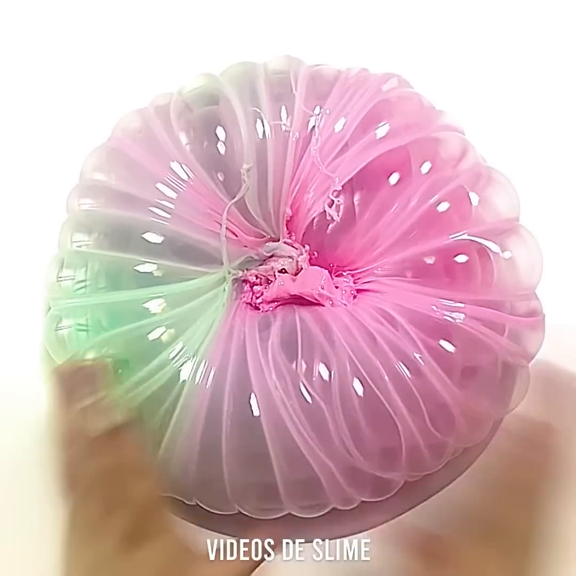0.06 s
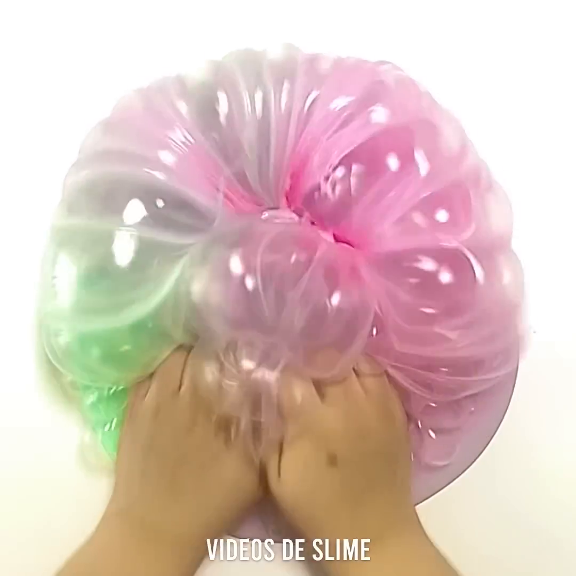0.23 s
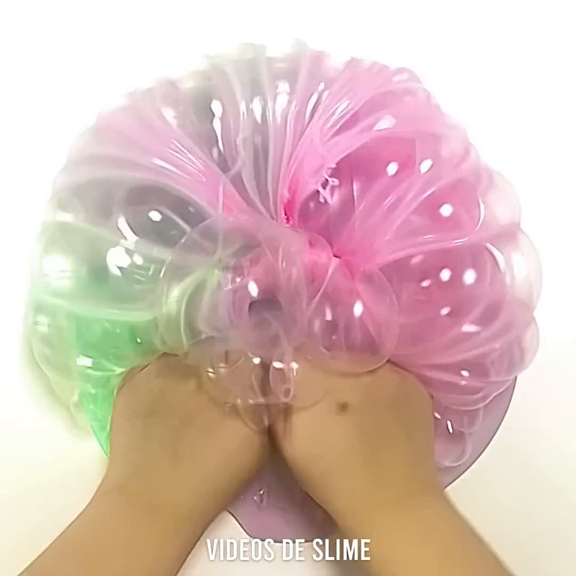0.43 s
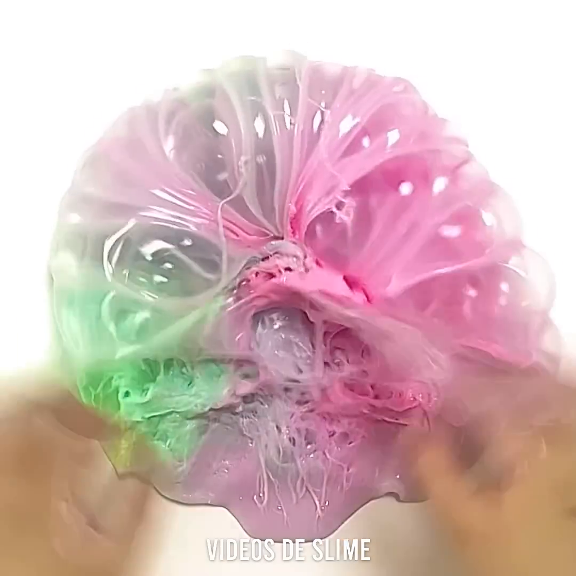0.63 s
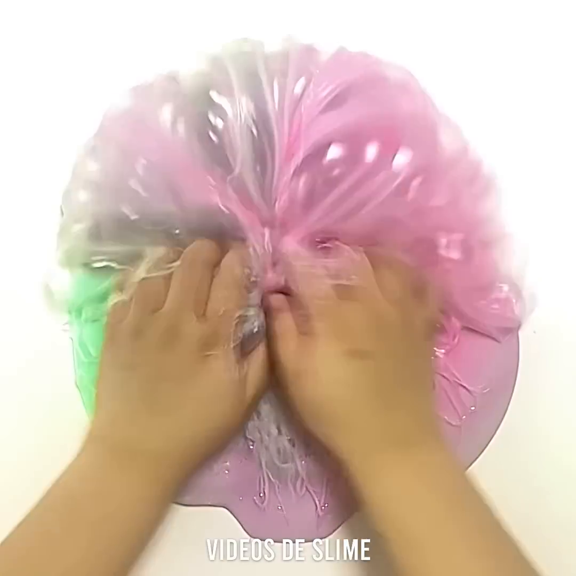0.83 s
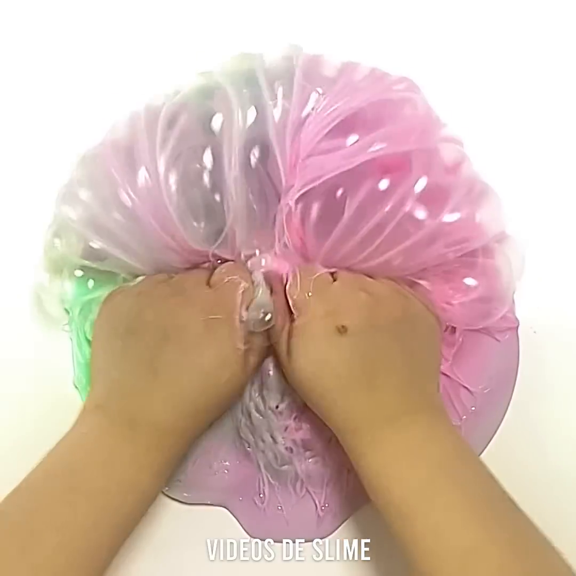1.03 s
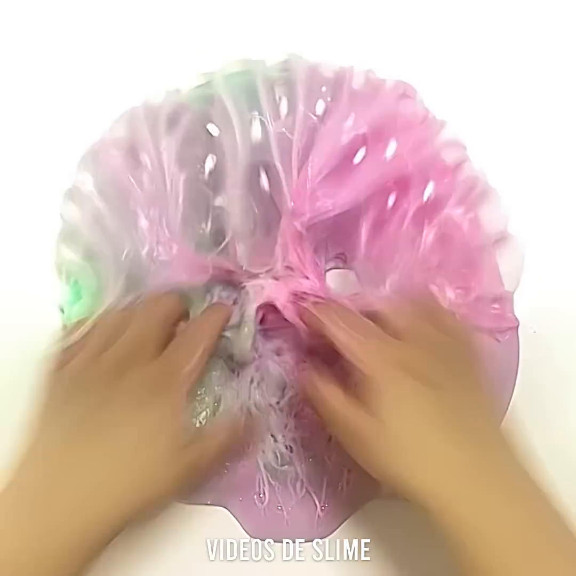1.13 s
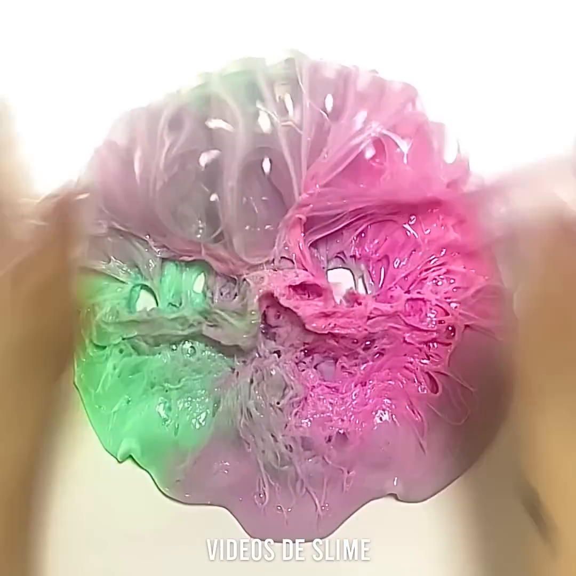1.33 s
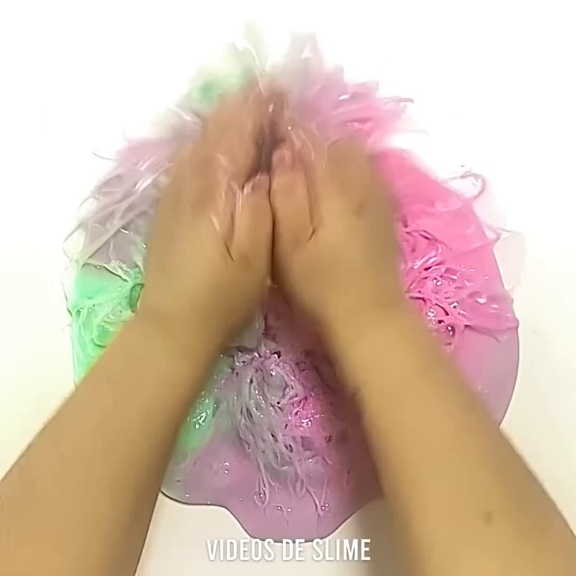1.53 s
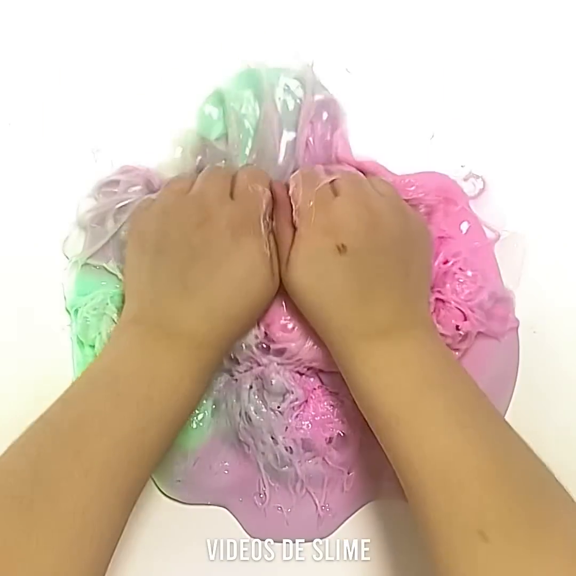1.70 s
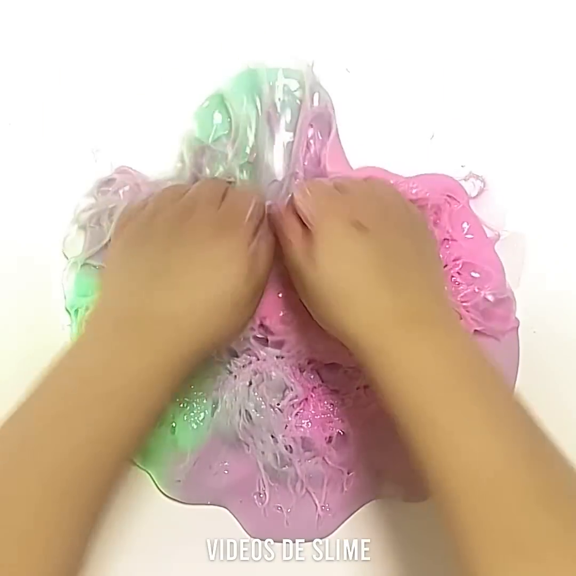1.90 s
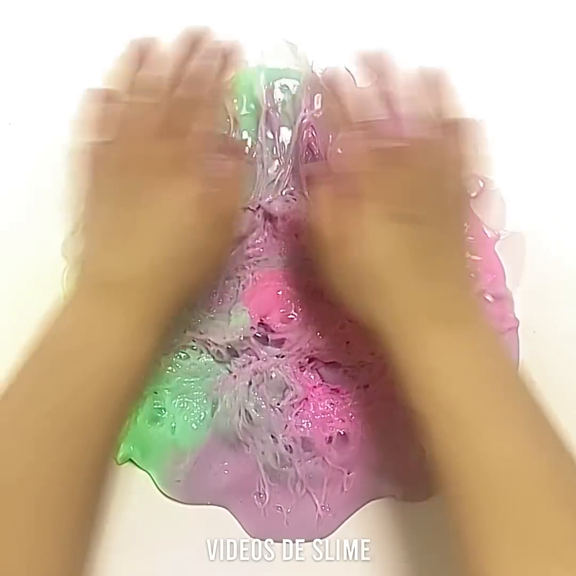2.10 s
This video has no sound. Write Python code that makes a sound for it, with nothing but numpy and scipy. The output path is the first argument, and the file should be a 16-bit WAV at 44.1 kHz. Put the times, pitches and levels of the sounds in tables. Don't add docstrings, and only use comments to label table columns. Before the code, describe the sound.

Three crunchy, gooey slime squishes full of popping air pockets and snapping films, in a quiet room

```python
import sys
import numpy as np
from scipy import signal
from scipy.fft import rfft, irfft
from scipy.io import wavfile
from scipy.ndimage import uniform_filter1d

SR = 44100
rng = np.random.default_rng(int(sys.argv[2]) if len(sys.argv) > 2 else 0)


def to_wav(sig):
    pcm = np.clip(np.atleast_2d(sig), -1, 1) * 32767
    pcm = np.round(pcm).astype(np.int16)
    wavfile.write(sys.argv[1], SR, pcm.T)


def field_ratio(decibels):
    return 10 ** (np.asarray(decibels, dtype=float) / 20)


N = 94815

# t/s, level/dB, wetness/dB (squelch over fizz)
PRESSES = [
    [(.08, -78.5, 3), (.185, -61.5, -5.5), (.225, -30, 16), (.27, -25.5, 0), (.33, -31.5, -5),
     (.43, -46, -2), (.52, -45, 1.5), (.74, -74.5, 1)],
    [(.76, -77.5, -2.5), (.8, -63, 1.5), (.836, -51, 1), (.875, -33.5, 4), (.95, -25, -3),
     (1.03, -48, -17.5), (1.13, -44, -0.5), (1.2, -59, 1), (1.4, -75.5, 1)],
    [(1.41, -68, 5), (1.5, -62.5, -22), (1.6, -55.5, -12.5), (1.67, -30, -4), (1.77, -36, -16),
     (1.83, -50.5, -3), (1.93, -47, -12.5), (2.12, -77, -3)],
]
# f/Hz, level/dB (per Hz)
SMEAR_SPECTRUM = [(88, -34.5), (150, -0.5), (309, -7), (1080, -2), (1290, 0.5), (2270, -8.5), (3350, -10),
                  (7760, -18), (16000, -33.5)]
# t/s, peak level/dB, ring f/Hz, t60/s
SNAPS = [(0.1495, -57.5, 4200, 0.01), (.1625, -49.5, 2900, .02), (0.1741, -51, 4720, 0.016),
         (0.2337, -18, 5260, 0.0066), (0.2689, -30, 5400, 0.016), (0.464, -37.5, 4380, 0.036),
         (0.4991, -26.5, 5840, 0.015), (.781, -58, 3430, 0.023), (.7865, -54.5, 3560, .02),
         (0.8044, -50.5, 8170, .03), (0.8144, -44, 8550, .015), (.8177, -40, 8600, .012),
         (.842, -41.5, 4500, .015), (0.8912, -18.5, 7500, 0.011), (0.9833, -31, 5800, .012),
         (1.215, -45.5, 4460, 0.022), (1.425, -62, 2275, 0.016), (1.444, -50, 2910, 0.023),
         (1.4965, -49, 3030, .02), (1.601, -32.5, 3400, .012), (1.6162, -36, 3480, 0.0061),
         (1.648, -30, 3870, .012), (1.867, -37.5, 3340, .015), (0.3194, -15, 5830, 0.0083),
         (.3770, -18.5, 4300, 0.022), (0.9023, -25, 5460, 0.029), (0.9104, -16.5, 3200, 0.02),
         (0.9419, -20, 6550, 0.0089), (0.9871, -20, 7900, 0.049), (0.9955, -11, 7920, 0.01),
         (1.0114, -21, 6500, 0.016), (1.2808, -42, 6450, 0.016), (1.531, -31, 3460, 0.015),
         (1.5509, -32, 3700, 0.028), (1.588, -35, 3380, 0.02), (1.6735, -12.5, 3640, 0.013),
         (1.6779, -17, 2520, 0.012), (1.7102, -21, 3450, 0.03), (1.7224, -20, 4240, 0.015),
         (1.788, -14, 3420, 0.012), (1.8002, -20.5, 4730, 0.011)]
# middle t/s, level/dB, centre f/Hz, half length/s
RIPS = [(0.2, -46, 2530, 0.0022), (0.29, -27.5, 1410, 0.0084), (0.28, -29, 4050, 0.0034),
        (0.33, -28, 1156, 0.011), (0.325, -28.5, 3520, 0.0018), (0.826, -53, 4000, .003),
        (0.48, -41, 2516, 0.004), (0.5, -29, 2950, 0.0016), (0.29, -35, 3500, .004),
        (.9325, -29.5, 7700, 0.0028), (0.99, -34.5, 8500, 0.0028), (.964, -25.5, 3000, .002),
        (1.556, -47, 3000, 0.0019), (1.659, -30.5, 2300, .002), (.8838, -24.5, 3000, 0.0025),
        (0.92, -31, 4500, 0.0069), (.9568, -22, 3070, 0.0035), (1.113, -43.5, 1760, 0.009),
        (1.663, -28.5, 2230, 0.0042), (1.684, -25.5, 3100, 0.005), (.299, -36, 8100, 0.0025),
        (0.36, -40, 4500, .003), (.241, -30.5, 5500, .003), (1.731, -32, 3500, 0.0028),
        (1.692, -30, 3600, 0.0054), (1.751, -32.5, 7970, 0.0075), (1.779, -25, 3750, 0.0014),
        (1.908, -40, 3300, 0.0078)]
# t/s, peak level/dB, pitch f/Hz, length/cycles
PLOPS = [(.178, -49, 1041, 6.7), (.201, -35, 1000, 4), (.212, -30.5, 998, 2.1), (.4675, -33, 1180, 5),
         (.494, -29, 1400, 4.1), (.808, -49.5, 1400, 4.7), (.814, -41.5, 900, 4), (.855, -42.5, 1050, 7),
         (.879, -22.5, 800, 3), (.886, -21.5, 1200, 6), (.924, -28, 550, 4), (.937, -26.5, 500, 3.4),
         (1.2158, -47.5, 670, 4), (1.236, -41.5, 566, 3.8), (1.531, -41.5, 940, 4.4),
         (1.581, -41.5, 614, 5.9), (1.622, -33, 486, 2.3), (.208, -26.5, 1060, 2.7),
         (0.2293, -26, 1540, 3.5), (0.2337, -17.5, 1076, 2.2), (.264, -20, 540, 3.3),
         (0.2937, -15, 1420, 3.2), (.304, -11.5, 1617, 8.3), (0.32, -16, 1997, 8), (0.3426, -18, 1465, 7),
         (0.502, -31, 600, 4.3), (.847, -31.5, 1017, 6.3), (0.8665, -28.5, 1130, 6.2),
         (0.9105, -15.5, 1294, 4.9), (.930, -24, 450, 7.3), (0.944, -30.5, 420, 4.6),
         (.989, -19, 1388, 5.4), (1.166, -42, 1280, 8.4), (1.2326, -31.5, 1200, 2.4),
         (1.543, -34, 796, 3.1), (1.5535, -29, 550, 4.2), (1.5882, -21, 423, 2.66), (1.6014, -20, 430, 2.9),
         (1.615, -29, 904, 1.8), (1.632, -24, 1320, 3.3), (1.647, -47.5, 1203, 2),
         (1.763, -20.5, 1560, 4.8), (1.8925, -30.5, 1200, 5.1), (2.01, -42.5, 583, 5.6)]
# t/s, length/s, level/dB, pitch f/Hz
SQUEAKS = [
    (.353, .014, -37, 7750),
    (1.738, .017, -29, 1850),
]
# t/s, level/dB, pitch f/Hz, length/cycles
THUDS = [(.2, -56, 110, 2.5), (.27, -51, 134.6, 13.2), (0.35, -54.5, 76, 2.9), (0.511, -55.5, 121, 0.89),
         (0.865, -52, 92, 5.4), (0.936, -43, 108, 3.5), (0.993, -47, 117, 3.9), (1.22, -47.5, 192, 1.53),
         (1.228, -57.5, 141, 3.6), (1.273, -60, 117, 2), (1.558, -44, 300, 2.1), (1.607, -51.5, 200, 2),
         (.925, -41.5, 425, 3.4), (1.619, -49.5, 80.6, 2.6), (1.685, -42, 123, 3), (1.699, -43, 360, 3.2),
         (1.91, -62, 108.5, 2.3), (2.014, -50, 114.4, 1.8)]
# f/Hz, width/Hz, level/dB
TABLE_MODES = [(73, 12, -4.5), (101.1, 9.9, -1.5), (131.1, 20, -2), (183, 50, -4), (290.4, 360, -9.5)]
# f/Hz, level/dB (per Hz)
AIR_SPECTRUM = [(15, -25), (25, 2.5), (123, -0.5), (317, -13.5), (383, -17.5), (1370, -21), (7500, -30.5),
                (8360, -26.5), (16000, -41.5)]


def evened(x):
    return x / np.sqrt(np.mean(x ** 2) + 1e-20)


def add(mix, start_s, sound):
    part = mix[round(start_s * SR):][:len(sound)]
    part += sound[:len(part)]


def coloured(spectrum):
    f, level_db = np.transpose(spectrum)
    hz = np.fft.rfftfreq(N, 1 / SR)
    gain = field_ratio(np.interp(np.log(hz + 1), np.log(f + 1), level_db))
    return evened(irfft(rfft(rng.standard_normal(N)) * gain, N))


def resonate(x, hz, width_hz):
    r = np.exp(-np.pi * width_hz / SR)
    return 2 * signal.lfilter([1 - r], [1, -r * np.exp(2j * np.pi * hz / SR)], x).real


def drift(rate_hz):
    wide = max(int(SR / rate_hz), 1)
    return evened(uniform_filter1d(uniform_filter1d(rng.standard_normal(N), wide), wide))


def blip(hz, cycles, sag, phase=0):
    u = np.arange(0, 2.5 * cycles * SR / hz) * hz / (cycles * SR)
    shape = 4.57 * np.sqrt(2 * u) * np.exp(-(1.2 * u) ** 2 - u)
    return shape * np.sin(2 * np.pi * cycles * u * (1 - sag * u / 2.24) + phase)


def swarm(band_hz, per_s, spread_db, cycles, tilt_db, clump_db, count):
    happens = rng.random(N) < per_s / SR
    bursts = field_ratio(spread_db * np.minimum(rng.exponential(1, N), 2.8)) * happens
    kind = rng.integers(0, count, N)
    luck = rng.random((count, 3))
    clumps = [field_ratio(clump_db * drift(rate_hz=150)) for _ in range(count // 5 + 1)]
    out = np.zeros(N)
    for k, hz in enumerate(np.geomspace(*band_hz, count)):
        length = cycles * (0.43 + 2.48 * luck[k, 0] ** 2)
        grain = blip(hz, length, .5 * luck[k, 1] - .15, 2 * np.pi * luck[k, 2])
        tilt = field_ratio(tilt_db * np.log2(hz / band_hz[0]))
        grain = grain / np.linalg.norm(grain) * tilt
        out += signal.oaconvolve(bursts * clumps[k // 5] * (kind == k), grain)[:N]
    return evened(out)


def squish():
    squelch_db, fizz_db, smear_db = -9.5, -9, -7
    s, pressure_db, wet_db = np.vstack(PRESSES).T
    t = np.arange(N) / SR
    pressure = field_ratio(np.interp(t, s, pressure_db))
    pressure = pressure * np.clip(np.minimum(t - s[0], s[-1] - t) / 0.0079, 0, 1)
    wet = field_ratio(np.interp(t, s, wet_db) / 2)
    clumps = field_ratio(1.1 * drift(rate_hz=140))
    squelch = swarm((450, 2196), per_s=1800, spread_db=9.0, cycles=3.14, tilt_db=2.0,
                    clump_db=3.0, count=24)
    fizz = swarm((2180, 11610), per_s=4500, spread_db=4.5, cycles=4.4, tilt_db=-0.5,
                 clump_db=3.0, count=30)
    squelch = field_ratio(squelch_db + 0.94 * drift(rate_hz=64)) * wet * squelch
    fizz = field_ratio(fizz_db + 0.74 * drift(rate_hz=78)) / wet * fizz
    smear = field_ratio(smear_db) * coloured(SMEAR_SPECTRUM)
    return pressure * clumps * (squelch + fizz + smear)


def snaps():
    crack_hz, tick_db, ring_db = 5400, 7, 12
    out, t = np.zeros(N), np.arange(2000) / SR
    for s, db, hz, t60 in SNAPS:
        noise = rng.standard_normal(len(t))
        crack = evened(resonate(resonate(noise, crack_hz, width_hz=6000), crack_hz, width_hz=9000))
        crack = crack * (1 + field_ratio(tick_db) * np.exp(-t / 0.00021))
        tone = np.sin(2 * np.pi * hz * t) * np.exp(-hz * t / 6)
        ring = tone + 0.36 * evened(resonate(noise, hz, width_hz=1700))
        shape = np.minimum(t / 0.00014, 1) * field_ratio(-60 * t / max(t60, .003))
        add(out, s, field_ratio(db - 13.5) * shape * (crack + field_ratio(ring_db) * ring))
    return out


def rips():
    out, t = np.zeros(N), np.arange(-900, 900) / SR
    for s, db, hz, half_s in RIPS:
        hiss, roughness = rng.standard_normal((2, len(t)))
        grit = field_ratio(3.5 * evened(uniform_filter1d(roughness, 24)))
        band = evened(resonate(resonate(hiss * grit, hz, 0.45 * hz), hz, 2 * hz))
        swell = np.exp(-abs(t / max(half_s, .001)) ** 1.3)
        add(out, s + t[0], field_ratio(db) * swell * band)
    return out


def plops():
    drop_hz, drop_cycles, grit_gain = 1902, .4, .55
    out = np.zeros(N)
    for s, db, hz, cycles in PLOPS:
        noise = rng.standard_normal(1500)
        cycles = max(cycles, 1)
        turns = (np.arange(0, cycles * SR / hz) * hz / SR)[:1500]
        pitch = hz + drop_hz * np.exp(-turns / drop_cycles)
        tone = np.sin(2 * np.pi * np.cumsum(pitch) / SR + 2 * noise[0])
        grit = evened(resonate(resonate(noise, 1.41 * hz, hz), 2.5 * hz, 2 * hz))[:len(turns)]
        shape = abs(np.sin(np.pi * (turns / cycles) ** .7)) ** .8
        add(out, s, field_ratio(db - 6.0) * shape * (tone + grit_gain * grit))
    return out


def squeaks():
    out = np.zeros(N)
    for s, length_s, db, hz in SQUEAKS:
        noise = rng.standard_normal(1500)
        u = np.arange(0, length_s, 1 / SR)[:1500] / length_s
        waver = evened(uniform_filter1d(noise, 90))[:len(u)]
        pitch = hz * (1 + .02 * waver + 300 / hz * u ** 2)
        whistle = np.sin(2 * np.pi * np.cumsum(pitch) / SR)
        add(out, s, field_ratio(db + 2.5 * waver) * np.sin(np.pi * u ** 2) * whistle)
    return out


def table_ring(x):
    out = np.zeros(N)
    for k, (hz, width_hz, db) in enumerate(TABLE_MODES):
        mode = resonate(resonate(x, hz, 2 * width_hz), hz, width_hz)
        out += (-1) ** k * field_ratio(db) * mode / np.sqrt(width_hz)
    return out


def thuds():
    rumble_db, rumble_t60_s = -4.5, 0.3
    beat, push, t = np.zeros(N), np.zeros(N), np.arange(SR // 2) / SR
    for s, db, hz, cycles in THUDS:
        add(beat, s, field_ratio(db) * blip(hz, max(cycles, 1), sag=0.12))
        add(push, s, field_ratio(db + rumble_db - 60 * t / rumble_t60_s))
    noise = rng.standard_normal(N)
    return beat + table_ring(noise * push) / np.std(table_ring(noise))


def room(x):
    t60_s = 0.23
    taps, at = np.zeros(SR // 3), np.arange(60, SR // 3 - 20, 20)
    taps[at + rng.integers(0, 20, len(at))] = rng.choice([-1., 1.], len(at))
    fall = field_ratio(-60 * np.arange(len(taps)) / SR / t60_s)
    taps = signal.lfilter([1], [1, -.4], taps * fall)
    return signal.fftconvolve(x, taps / np.linalg.norm(taps))[:N]


def air():
    return field_ratio(-71) * coloured(AIR_SPECTRUM)


def scene():
    slime = squish() + snaps() + rips() + plops() + squeaks()
    return (slime + field_ratio(-14) * room(slime) + thuds() + air())[None]


def low_pass(x):
    return signal.sosfilt(signal.butter(12, 16140, fs=SR, output="sos"), x)


def record(dry):
    bass_cut = signal.butter(4, 64, "high", fs=SR, output="sos")
    dulling = signal.butter(1, 9000, fs=SR, output="sos")
    edge = signal.firwin(255, 16100, window=("kaiser", 9), fs=SR)[None]
    heard = signal.sosfilt(np.vstack([bass_cut, dulling]), dry)
    mix = signal.oaconvolve(heard, edge, "same")
    return low_pass(mix)


dry = scene()
out = record(dry)
to_wav(out)
```